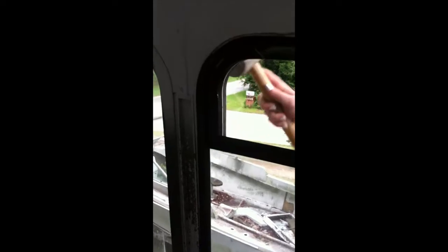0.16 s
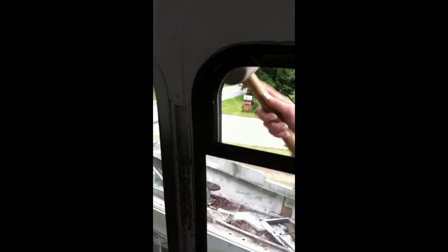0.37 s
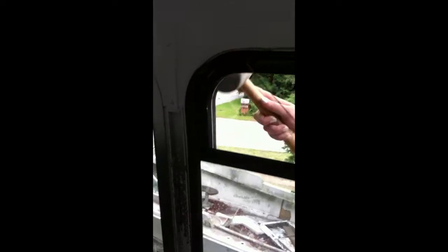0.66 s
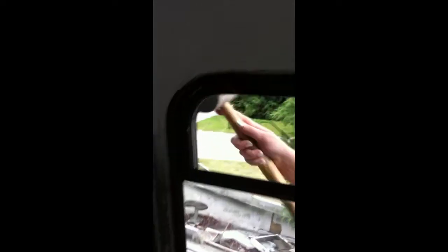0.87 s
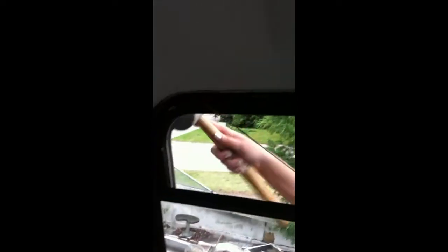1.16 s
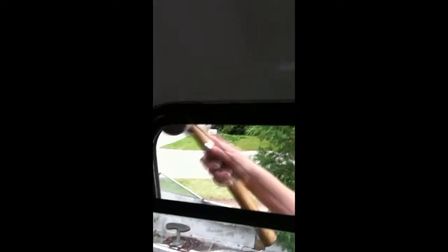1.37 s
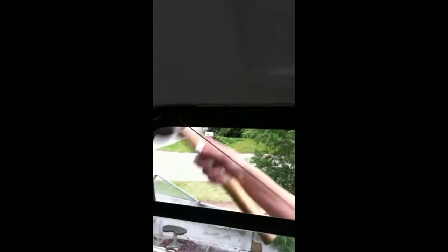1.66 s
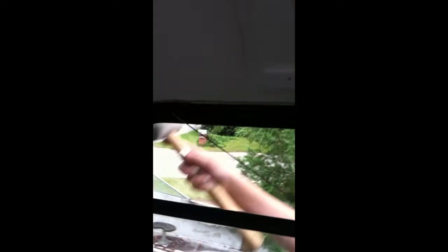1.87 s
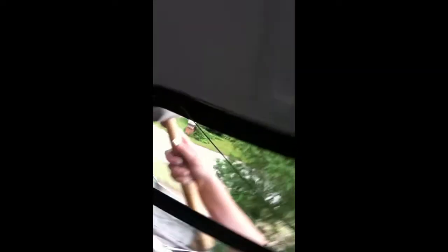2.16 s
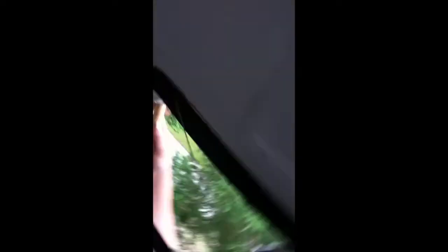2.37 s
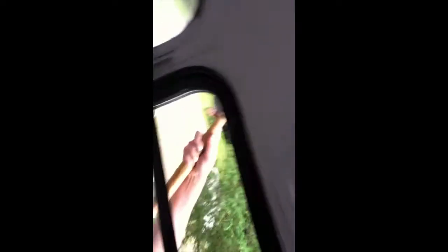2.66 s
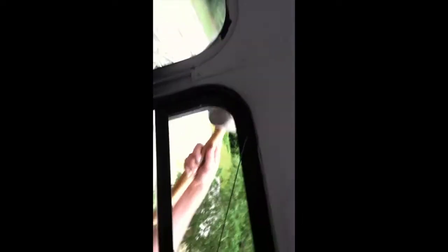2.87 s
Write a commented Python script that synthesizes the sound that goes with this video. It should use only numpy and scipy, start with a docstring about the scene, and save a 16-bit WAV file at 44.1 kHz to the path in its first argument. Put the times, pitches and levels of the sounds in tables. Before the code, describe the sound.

Even, quick mallet blows on a glass pane in rubber, varying from soft thuds to bright rattling knocks, ring through a large bare vehicle; slight scuffs midway, quiet outdoor hush, mono handheld microphone inside.

```python
"""Tapping a glass pane into a vehicle

A mallet taps a glass pane into its rubber gasket inside a large empty vehicle, about four blows a second.
Each blow swings the pane in a short knock (swelling tones), chatters the glass in its frame (random clicks)
and sets the body shell booming (ringing modes). The hard cabin carries it on as fading noise, over soft
scuffs (hissing noise) and quiet outdoor air (steady noise)."""
import sys
import numpy as np
from scipy import signal
from scipy.io import wavfile
from scipy.ndimage import uniform_filter1d

SR = 44100
rng = np.random.default_rng(int(sys.argv[2]) if len(sys.argv) > 2 else 0)


def amplitude_ratio(level_db):
    """Convert a level in decibels to the matching linear amplitude (field) ratio."""
    exponent = np.asarray(level_db, float) / 20
    return 10 ** exponent


def materialize(psi):
    """Save the field psi as 16-bit PCM at rate SR to the path in sys.argv[1].

    A 1-D psi becomes a single channel; in a 2-D psi each row is a channel.
    """
    bounded = np.clip(np.atleast_2d(psi).T, -1, 1)
    quanta = np.round(bounded * 32767).astype(np.int16)
    wavfile.write(sys.argv[1], SR, quanta)


N = 132300   # length of the scene [samples]
TAIL = SR * 3 // 4   # length of the sound of one blow [samples]


def rms_one(x):
    """Scale to unit rms."""
    return x / np.sqrt(np.mean(x ** 2) + 1e-20)


def at_hz(points, hz):
    """Read a table of (frequency, value) on a log-frequency axis."""
    table_hz, values = np.array(points).T
    return np.interp(np.log(hz), np.log(table_hz), values)


def bands(x):
    """Yield centre and content of each half-octave band; signs alternate so that neighbours join smoothly."""
    edges = 28.3 * 2 ** np.arange(0, 9.6, 0.5)
    for k, (low, high) in enumerate(zip(edges, edges[1:])):
        band_filter = signal.butter(2, [low, high], "band", fs=SR, output="sos")
        yield np.sqrt(low * high), (-1) ** k * signal.sosfilt(band_filter, x)


def ring(x, hz, t60):
    """A resonance: a unit click starts a sine of height 1 that falls by 60 dB in t60 seconds."""
    decay = amplitude_ratio(-60 / (t60 * SR))   # per sample
    angle = 2 * np.pi * hz / SR
    feedback = [1, -2 * decay * np.cos(angle), decay * decay]
    return signal.lfilter([0, np.sin(angle)], feedback, x + 1e-18)


def place(times, rows):
    """Lay one row of sound at each time; a blow may start up to a second before the scene."""
    out = np.zeros(N + 2 * SR)
    for s, row in zip(times, rows):
        i = int(s * SR) + SR
        out[i:i + len(row)] += row
    return out[SR:SR + N]


def swing(db, hz, peak_s):
    """A bending mode of the pane swells to one largest swing and is stopped by its rubber."""
    width_s, onset_s = 0.0049, 0.00067   # spread of the swell; ramp at first contact
    t = np.arange(TAIL) / SR
    swell = np.exp(-0.5 * ((t - peak_s) / width_s) ** 2) * np.minimum(t / onset_s, 1)
    return amplitude_ratio(db)[:, None] * swell * np.cos(2 * np.pi * hz[:, None] * (t - peak_s))


def knock(db, hz):
    """Two bending modes of the pane and the bright tick of first contact."""
    # upper part of each blow, in order:
    # (second pane mode [Hz], level of that mode [dB], level of the glassy tick [dB])
    upper_rings = [(500, -25, -30), (597, -28, -38), (642, -26, -14), (542, -28.5, -16), (550, -38, -16),
                   (450, -22, -21), (490, -13.5, -29), (508, -18, -46), (508, -20, -23), (500, -23.5, -45),
                   (857, -29, -52), (462, -21, -52)]
    upper_hz, upper_db, tick_db = np.transpose(upper_rings)
    main = swing(db, hz, peak_s=0.01075)
    upper = swing(upper_db, upper_hz, peak_s=0.011)
    touch = np.arange(TAIL) == 0   # a single click
    tick = amplitude_ratio(tick_db)[:, None] * ring(touch, hz=3340, t60=0.0065)
    return main + upper + tick


def chatter(db, delay, tilt_db):
    """Dense uneven glass-on-frame clicks swell and die just after contact."""
    clicks_per_s, spread_db = 3000, 5
    rise_s, t60_s = 0.0059, 0.047
    # colour of the rattling glass: (frequency [Hz], level [dB])
    glass_colour = [(300, -20), (700, 11.5), (1300, 2.5), (2600, 4.5), (4000, 3), (7000, -5.5), (11000, -1),
                    (15500, -106.5)]
    t = np.maximum(np.arange(TAIL)[None] / SR - delay[:, None], 0)
    shape = (len(db), TAIL)
    happens = rng.random(shape) < clicks_per_s / SR
    strength = amplitude_ratio(spread_db * np.minimum(rng.exponential(1, shape), 2))
    clicks = rms_one(happens * strength * rng.choice([-1, 1], shape))
    rise = 1 - np.exp(-t / rise_s)
    fall = amplitude_ratio(db[:, None] - 60 * t / t60_s)
    rattle = clicks * rise * fall + 1e-18
    out = 0
    for hz, band in bands(rattle):
        tilt = tilt_db[:, None] * np.log2(hz / 2000)
        out = out + amplitude_ratio(at_hz(glass_colour, hz) + tilt) * band
    return out


def boom(db):
    """Thrust, return and an uneven shudder strike the shell modes, a little differently each time."""
    shudder_db, shudder_s = -9, 0.0063   # strength and fading time of the uneven push
    spread_db, detune = 3.5, 0.005   # change per blow: mode strength, and pitch as a fraction
    # body shell modes: (frequency [Hz], relative level [dB], time to fall by 60 dB [s])
    shell_modes = [(79, -24, 1), (110.5, -15, 0.7), (137.7, 4.5, 0.2), (148, -32, 0.86), (162.6, -3, 0.48),
                   (183, -12.5, 0.6), (206.8, 0.5, 0.28), (237.2, -4, 0.55), (264, -14.5, 0.34),
                   (367, -8.5, 0.16), (473.9, -9.5, 0.24), (575, -23, 0.24)]
    # the thrust, and its return from the far end of the cabin: (time after the blow starts [s], level [dB])
    thrusts = [(.004, -0.5), (.048, -2)]
    t = np.arange(TAIL) / SR
    out = []
    for level_db in db:
        push = rng.standard_normal(TAIL) * t * np.exp(-t / shudder_s)
        push = amplitude_ratio(shudder_db) * push / np.sqrt(np.sum(push ** 2))
        for s, thrust_db in thrusts:
            push[int(abs(s) * SR)] += amplitude_ratio(thrust_db)
        draw = rng.standard_normal((len(shell_modes), 2))
        ringing = 0
        for k, ((hz, mode_db, t60), (a, b)) in enumerate(zip(shell_modes, draw)):
            gain = amplitude_ratio(level_db - 9 + mode_db + spread_db * a) * (-1) ** k
            ringing = ringing + gain * ring(push, hz * (1 + detune * b), t60)
        out.append(ringing)
    return np.array(out)


def cabin(db, tilt_db):
    """Diffuse reflections of each blow build up, then die band by band, keeping a few glass modes alive."""
    build_s = 0.002
    clump_db, clump_s = 2.0, 0.006   # reflections arrive in uneven clumps
    # colour of the echo before a general fall towards the treble: (frequency [Hz], level [dB])
    echo_colour = [(100, -53), (200, -6.5), (300, -1), (450, -2.5), (800, -7), (1600, -13.5), (3000, -12),
                   (6000, -20.5), (11000, -31), (15500, -24.5)]
    # how long the cabin rings: (frequency [Hz], time to fall by 60 dB [s])
    echo_t60 = [(80, 0.17), (160, 0.54), (420, 0.23), (1100, 0.32), (2900, 0.35), (7700, 0.42),
                (15000, 0.22)]
    # glass modes fed by the echo: (frequency [Hz], level [dB], time to fall by 60 dB [s])
    glass_rings = [(2650, -38, .03), (3450, -39, .03)]
    t = np.arange(TAIL) / SR
    diffuse = 0
    for hz, band in bands(rng.standard_normal((len(db), TAIL))):
        colour_db = at_hz(echo_colour, hz) - 7.2 * np.log10(hz / 1000)
        tilt = tilt_db[:, None] * np.log2(hz / 1000)
        diffuse = diffuse + band * amplitude_ratio(colour_db + tilt - 60 * t / at_hz(echo_t60, hz))
    echo = diffuse + sum(amplitude_ratio(ring_db) * ring(diffuse, hz, t60) for hz, ring_db, t60 in glass_rings)
    clumps = rng.standard_normal(echo.shape)
    for _ in range(2):   # smooth twice
        clumps = uniform_filter1d(clumps, size=int(clump_s * SR))
    clumps = rms_one(clumps)
    return amplitude_ratio(db[:, None] + clump_db * clumps) * echo * (1 - np.exp(-t / build_s))


def scuffs():
    """A hand or tool rubs the frame lightly: short soft hiss with a bump near 3 kHz."""
    bump_hz, bump_width_hz, hiss_gain_db = 3000, 830, 2.5
    # scuffs: (start [s], length [s], level [dB])
    rubs = [(1.451, 0.12, -46.5), (1.617, 0.18, -50.5)]
    t = np.arange(N) / SR
    noise = rng.standard_normal(N)
    hiss_band = signal.butter(2, [1500, 8500], "band", fs=SR, output="sos")
    hiss = signal.sosfilt(hiss_band, noise)
    bump = rms_one(ring(noise, bump_hz, 2.2 / bump_width_hz))
    strokes = 0
    for s, length, db in rubs:
        progress = np.clip((t - s) / length, 0, 1)
        strokes = strokes + amplitude_ratio(db) * np.sin(np.pi * progress ** 0.57)   # swells faster than it fades
    return (bump + amplitude_ratio(hiss_gain_db) * hiss) * strokes


def air():
    """Steady outdoor hush: coloured noise, each band wavering a little."""
    level_db, waver_db = -44, 0.7
    # colour of the hush: (frequency [Hz], relative level [dB per Hz])
    air_colour = [(30, -12), (60, -27), (136, -5.5), (224, 1.5), (400, -7), (1000, -10.5), (2570, -15.5),
                  (6160, -30), (10700, -38.5), (15000, -62)]
    out = 0
    for hz, band in bands(rng.standard_normal(N + SR)):
        # a new random level ten times a second
        waver = np.interp(np.arange(N) / SR * 10, np.arange(40), rng.standard_normal(40))
        out = out + amplitude_ratio(at_hz(air_colour, hz) + waver_db * waver) * band[SR:]   # skip the filter's start
    return amplitude_ratio(level_db) * rms_one(out)


def scene():
    """Direct sound of the blows, plus the indirect and quiet parts: cabin echo, scuffs and air."""
    # blows: (time [s], knock level [dB], knock frequency [Hz], boom level [dB], chatter level [dB],
    # chatter delay [s], chatter brightness [dB per octave])
    blows = [(-.13, -12, 290, -11, -16, 0.009, 0), (0.1379, -22.5, 343, -16.5, -11, 0.0028, -2),
             (.419, -13.5, 288, -17.5, -13, 0.0009, -4.5), (0.713, -13, 323, -20.5, -12.5, 0.0012, -2),
             (0.9559, -21.5, 264, -19.5, -28.5, .0005, 0), (1.2355, -17.5, 294, -19, -17, 0.0025, 0.5),
             (1.4898, -11, 282, -16, -14, 0.00096, -2.5), (1.7745, -12, 295, -17, -8, 0.0027, -2.5),
             (2.0227, -17, 274, -21.5, -20, 0.00034, -1.5), (2.2935, -19, 268, -19, -24.5, 0.0061, 2.5),
             (2.56, -14.5, 259, -18, -8.5, 0.0013, -2.5), (2.8403, -10, 276, -17.5, -24, 0.00068, 1)]
    # echo of each blow, same order: (level [dB], brightness [dB per octave])
    echoes = [(-0.5, -1), (-5, 0), (-4.5, -1), (-5.5, -0.5), (-9, -0.5), (-6, -1), (-6, 0), (-3.5, -0.5),
              (-9.5, -0.5), (-9.5, -1), (-4, 0), (-5.5, -1)]
    s, knock_db, knock_hz, boom_db, chatter_db, delay, tilt_db = np.transpose(blows)
    near = knock(knock_db, knock_hz) + chatter(chatter_db, np.maximum(delay, 0), tilt_db) + boom(boom_db)
    echo_db, echo_tilt_db = np.transpose(echoes)
    thin = signal.butter(3, 100, "high", fs=SR, output="sos")   # thin panels radiate little deep bass
    dull = signal.cheby2(8, 30, 15200, fs=SR, output="sos")   # 30 dB down or more above 15.2 kHz
    far = signal.sosfilt(thin, place(s, cabin(echo_db, echo_tilt_db))) + scuffs() + air()
    mix = signal.sosfilt(thin, place(s, near)) + signal.sosfilt(dull, far)
    return mix[None]   # one channel


def low_pass(x):
    """Removes everything above the highest recorded frequency."""
    return signal.sosfilt(signal.butter(12, 16390, fs=SR, output="sos"), x)


def record(dry):
    """Small microphone with a falling top and rounded peaks."""
    top_hz, ceiling = 13400, 0.75   # ceiling: as a share of full scale
    x = signal.sosfilt(signal.butter(3, top_hz, fs=SR, output="sos"), dry)
    rounded = ceiling * np.tanh(x / ceiling)
    return low_pass(rounded)


dry = scene()
out = record(dry)
materialize(out)
```